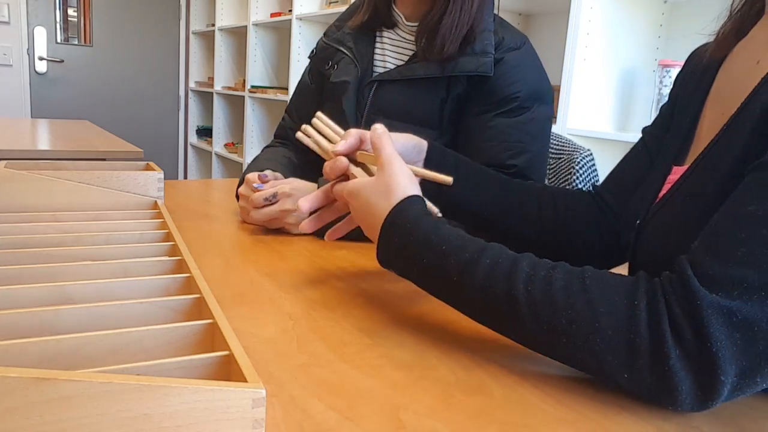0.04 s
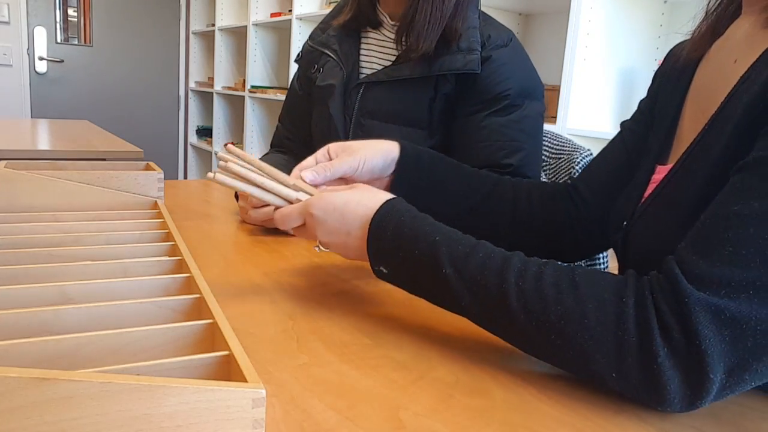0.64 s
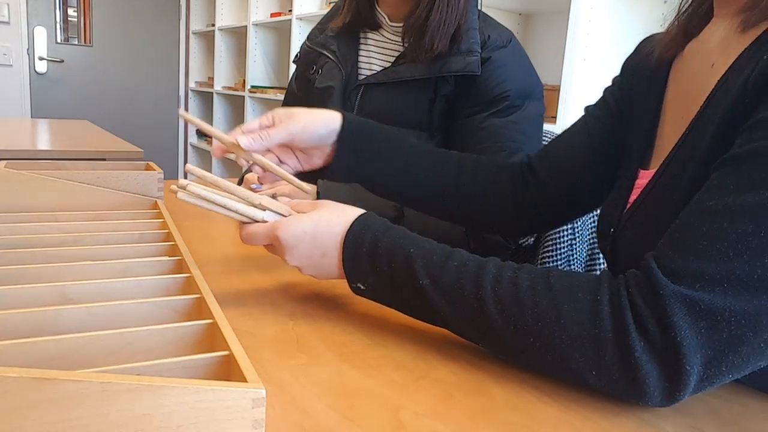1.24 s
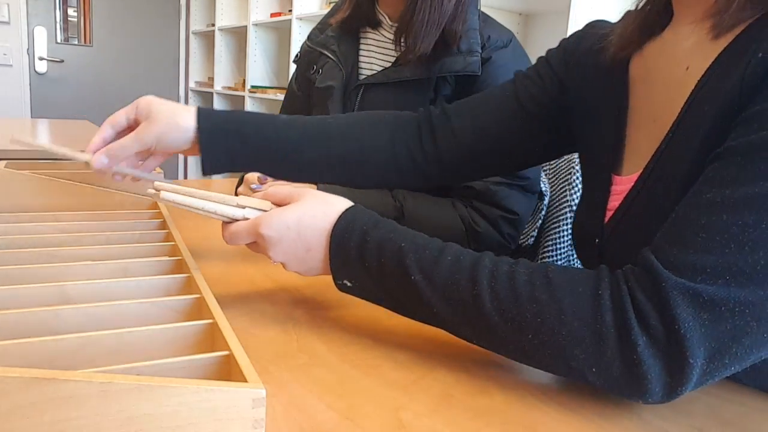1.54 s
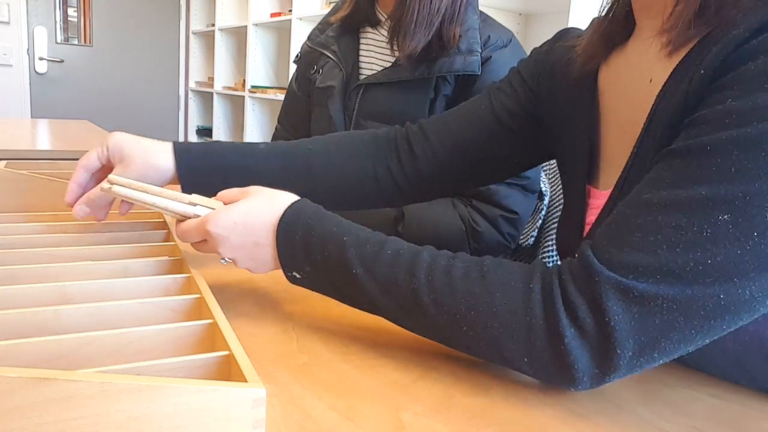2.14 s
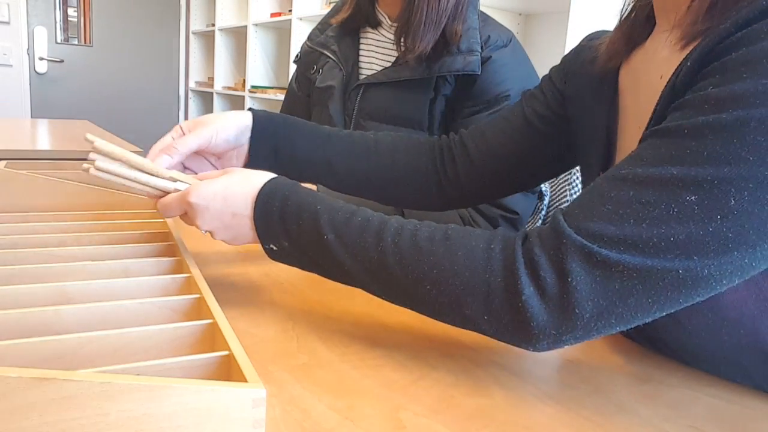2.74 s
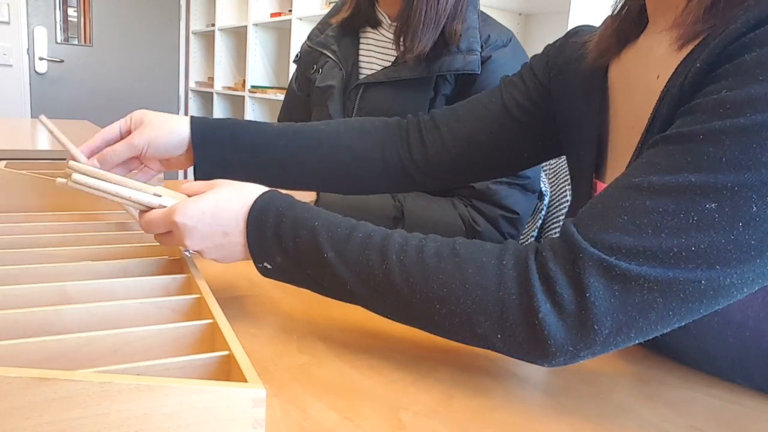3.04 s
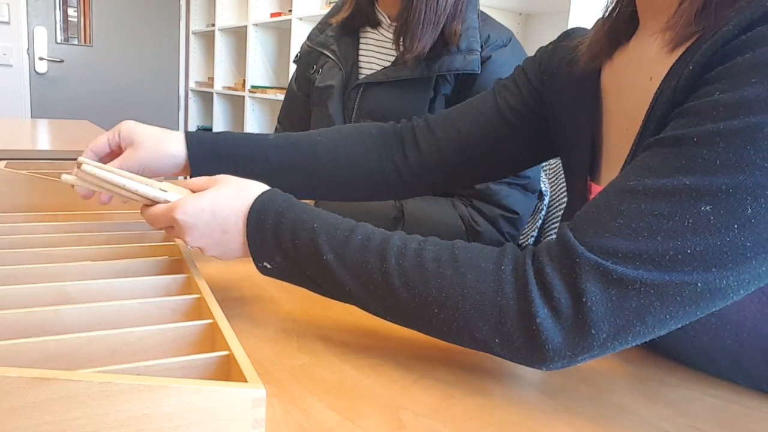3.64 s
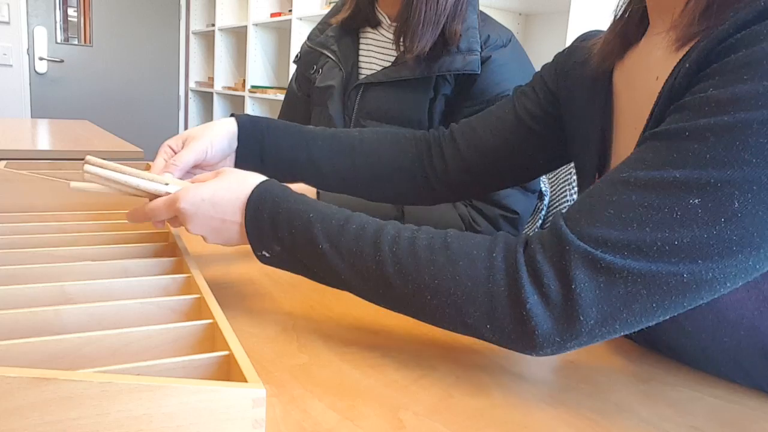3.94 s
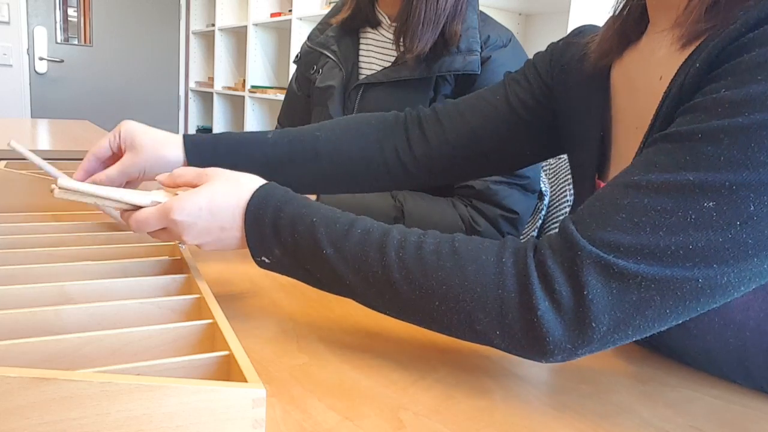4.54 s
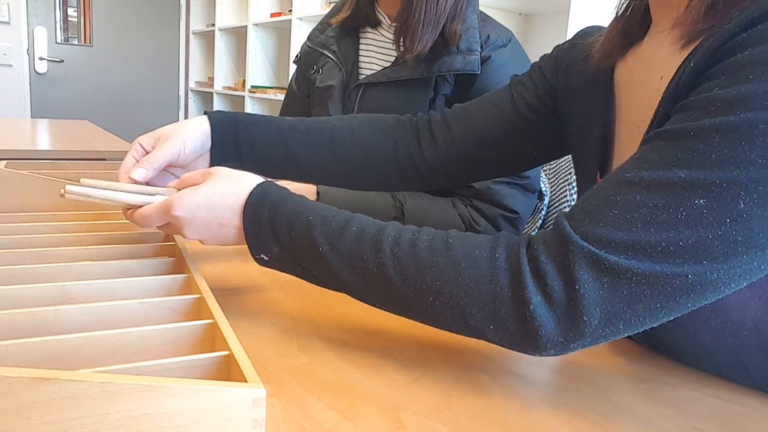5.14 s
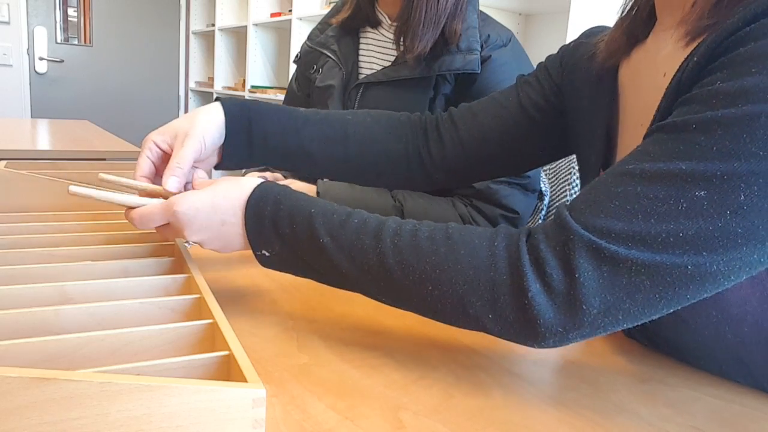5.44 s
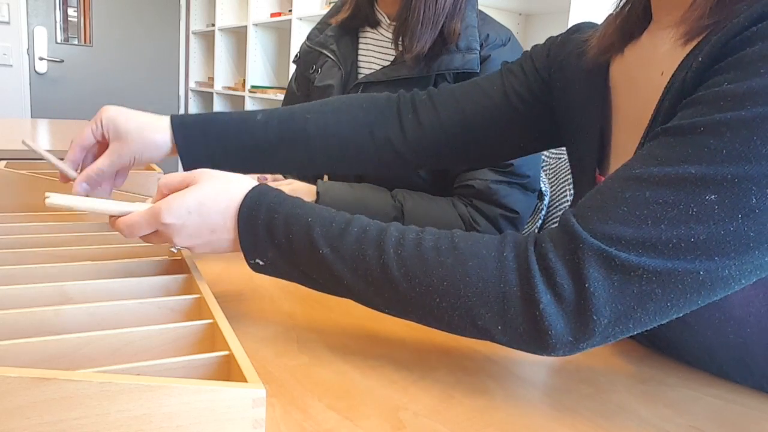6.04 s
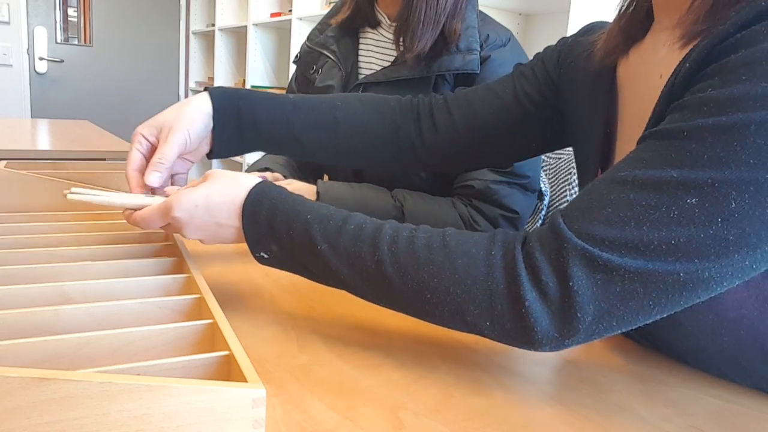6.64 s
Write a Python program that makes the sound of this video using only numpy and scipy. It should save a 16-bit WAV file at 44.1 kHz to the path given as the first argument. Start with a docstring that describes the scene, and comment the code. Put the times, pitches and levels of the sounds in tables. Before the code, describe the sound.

Wooden spindles drop one by one into a wooden box, knocking, clacking and rattling to rest over a low room hum.

```python
"""Wooden spindles drop one by one into a compartment of a wooden box, on a table close to the microphone.
Each knocks on the thin boards, clacks against the spindles already there, bounces and rocks to rest.
Between drops the bundle in the hand ticks and rubs as the next one is drawn.
The room is fairly live, with a low hum behind everything."""
import sys
import numpy as np
from scipy import signal
from scipy.fft import rfft, irfft
from scipy.io import wavfile

SR = 44100
rng = np.random.default_rng(int(sys.argv[2]) if len(sys.argv) > 2 else 0)


def bounce(signal):
    """Save signal as a 16-bit WAV file at the path given by the first command-line argument."""
    frames = np.transpose(np.atleast_2d(signal))
    limited = np.clip(frames, -1, 1)
    pcm = np.round(limited * 32767).astype(np.int16)
    wavfile.write(sys.argv[1], SR, pcm)


N = 299880
HIT_SIZE = 8192
AGE = np.arange(HIT_SIZE) / SR   # seconds since a contact

# spectrum of a push on the boards: f/Hz, level/dB
KNOCK_SPECTRUM = [(60, -29.5), (140, -9), (400, -4), (700, -12), (950, -2), (1400, 1), (2000, -3),
                  (2900, -1), (3800, -11.5), (6000, -22), (8500, -25), (12000, -41), (16000, -44.5)]
# spectrum of wood rubbing on wood: f/Hz, level/dB
RUB_SPECTRUM = [(600, -36.5), (1300, -13), (1900, 1.5), (2700, -7), (3900, -2.5), (5300, -12.5), (8200, -4),
                (9800, -14.5), (11200, -14), (12300, -22.5), (16000, -26.5)]
# a dropped spindle rolling among the others: t/s, length/s, level/dB
ROLL_SPELLS = [(2.178, .14, -37.5), (3.551, 0.094, -36), (3.677, .09, -46.5), (4.676, 0.078, -56.5),
               (4.799, 0.36, -37), (6.141, .03, -38.5), (6.208, .045, -34), (6.321, 0.172, -32.5),
               (6.558, 0.046, -37), (6.714, 0.046, -42.5)]
ROLL_SAG_DB_PER_S = 25
# diffuse sound at the microphone: f/Hz, left-right correlation
COHERENCE = [(30, 0), (70, 1), (150, 0.92), (330, 1), (700, 0.079), (1400, 0.13), (16000, 0)]


def box_knocks(ring_db=-2, spindle_t60=.14, ring_tilt=.4):
    """A knock pushes the boards and rings both box and spindle; soft touches ring duller."""
    # hard landings on the boards: t/s, level/dB, brightness/(dB/octave)
    landings = [ (1.781, -33.5, 2.5), (2.083, -19, 8), (2.089, -12, 1.5), (2.106, -24, 12.5),
                (2.166, -9.5, -2.5), (2.259, -25, 0.5), (2.308, -25.5, 11), (3.261, -44, -5.5),
                (3.389, -39.5, -4), (3.533, -17, -1), (3.54, -12.5, 7.5), (3.579, -16.5, 7.5),
                (3.618, -13, -6), (3.675, -11, 2.5), (3.705, -24, 0), (4.671, -27.5, -2.5),
                (4.795, -20, -2), (4.803, -15, 1), (4.822, -12.5, -6), (4.84, -15, 9), (4.907, -17, -3),
                (5.005, -14, 5.5), (5.076, -16.5, 0.5), (6.308, -10.5, 2.5), (6.324, -17.5, -6),
                (6.329, -13, 4.5), (6.404, -16, -0.5), (6.464, -17, 1.5), (6.549, -12, 3),
                (6.555, -14.5, 7.5)]
    # box resonances: f/Hz, level/dB, t60/s
    box_modes = [(140, -18, 0.1), (239, -17, 0.15), (330, -13.5, 0.14), (406, -21.5, 0.16),
                 (535, -9.5, 0.032), (659, -14.5, 0.09), (870, -7, 0.078), (966, -6, 0.052),
                 (1010, -2.5, 0.061), (1358.5, -0.5, 0.049), (1496, -4, 0.044), (1660, -6.5, 0.024),
                 (1854, -8, 0.031), (2060, -8, 0.12), (2434, -6, 0.059), (2685, -8, 0.11), (2970, -13, .04)]
    # the mode a spindle keeps through its bounces: from t/s, f/Hz, level/dB relative to the push
    spindle_notes = [(0, 6480, -22), (2.24, 6850, -18.5), (3.2, 6470, -24), (4.81, 7380, -11),
                     (5.0, 7470, -29.5), (6.1, 3710, -11.5)]
    out = np.zeros((2, N))
    for s, level_db, brightness in landings + bounces():
        _, hz, spindle_db = [note for note in spindle_notes if note[0] <= s][-1]
        push = near_echoes(pulse(KNOCK_SPECTRUM, brightness), echo_db=-2, span_s=.003)
        tilt = ring_tilt * brightness
        modes = [(f, db + hardness_db(f, tilt), t60) for f, db, t60 in box_modes]
        body = from_db(ring_db) * ringing(modes, detune=.016, left_lag_s=.00022)
        spindle = ringing([(hz, 0, spindle_t60)], spread_db=3, detune=.021)
        add_hit(out, s, level_db, push + body + from_db(spindle_db + hardness_db(hz, tilt)) * spindle)
    return out


def bounces():
    """A spindle bounces or rocks end to end: each touch is weaker, the gaps change by a steady ratio."""
    # t/s, touches, first gap/s, gap ratio, level/dB, loss per touch/dB, brightness/(dB/octave)
    bounce_runs = [ (2.212, 7, .0235, 1.03, -22, 1.2, -6.5), (2.403, 6, .0345, 1.1, -40.5, 0.74, -17.5),
                   (3.752, 4, .012, .95, -23, 2.5, -5.5), (4.884, 5, 0.022, 1.02, -20, 1, 3),
                   (5.041, 4, .0345, 0.94, -21, 3.5, -2.5), (6.147, 6, 0.032, 0.75, -24, 0.9, -5),
                   (6.344, 3, .019, .7, -21.5, 2, -0.5), (6.453, 3, .040, .55, -22, 2, -6.5),
                   (6.591, 4, .022, .78, -21.5, 2, -9.5), (6.701, 4, 0.014, 1.04, -25.5, 0.5, -7)]
    knocks = []
    for s, touches, gap_s, ratio, level_db, loss_db, brightness in bounce_runs:
        for k in range(touches):
            knocks.append((s, level_db - k * loss_db, brightness))
            s += gap_s * ratio ** k
    return knocks


def board_tocks():
    """A square blow makes one board sing; a spindle held on the rim gives a lower, hollow tock."""
    # square blows on a thin board: t/s, level/dB, f/Hz
    blows = [(3.541, -10, 1061), (4.828, -9, 1075), (6.404, -10, 1090)]
    # modes of that board: ratio to the strongest, level/dB, t60/s
    board_modes = [(1, -2.5, 0.063), (1.3, -10.5, 0.025), (1.65, -12.5, 0.04), (2.22, -19.5, .03),
                   (2.85, -10.5, .03)]
    # a held spindle set against the rim: t/s, level/dB
    rim_taps = [(1.751, -19.5), (1.865, -41), (3.259, -42), (3.387, -40.5), (4.745, -41.5)]
    # modes of the rim under the spindle: f/Hz, level/dB, t60/s
    rim_modes = [(407, -10.5, 0.075), (466, -6, 0.045), (685, -4, 0.022), (843, -3.5, 0.018),
                 (990, 2, 0.021), (1710, -7.5, 0.019), (2130, -4.5, .035), (2550, -7, .018),
                 (2850, -8.5, 0.02)]
    out = np.zeros((2, N))
    for s, level_db, hz in blows:
        ring = ringing(board_modes, hz, spread_db=6, detune=.002, sway=.47, left_lag_s=.000081)
        add_hit(out, s, level_db, ring)
    for s, level_db in rim_taps:
        add_hit(out, s, level_db, ringing(rim_modes, detune=.0016, sway=.56, left_lag_s=.00033))
    return out


def spindle_clacks(crack_tilt=.6):
    """Hard wood on hard wood in the box: a sharp crack, then the bending modes of a loose spindle."""
    # spindles striking each other: t/s, level/dB, main mode f/Hz, brightness/(dB/octave)
    strikes = [ (2.084, -20.5, 6500, -2), (2.091, -10, 6450, 17), (2.095, -16.5, 6560, 15),
               (2.187, -26.5, 6470, -10), (2.244, -27.5, 6840, 0), (2.31, -30.5, 6790, -3),
               (3.543, -19.5, 7180, 1), (3.55, -18, 7820, -2), (3.604, -24.5, 6630, -10),
               (3.636, -24.5, 7580, -9), (3.642, -25.5, 6470, -8), (3.708, -32, 7250, -10.5),
               (4.823, -17.5, 7390, -3), (4.839, -21.5, 7280, -6), (4.878, -27, 7430, -6),
               (4.933, -21.5, 7090, -1.5), (5.005, -20.5, 8060, -15), (5.144, -45.5, 7600, -5),
               (5.252, -32, 6900, -1), (6.23, -28, 7000, -22), (6.31, -21, 7160, -20),
               (6.324, -20.5, 6930, -9), (6.335, -22, 7370, -5), (6.403, -24.5, 6630, -21),
               (6.465, -27, 6870, 9), (6.551, -26, 6800, -17)]
    # spectrum of the crack: f/Hz, level/dB
    crack_spectrum = [(300, -36), (1200, -21), (1900, -8), (2700, -6.5), (4100, -5.5), (5400, -4.5),
                      (6100, -7.5), (7600, -5), (8800, -7), (10000, -12.5), (11200, -11), (12800, -19.5),
                      (16000, -19.5)]
    # bending modes: ratio to the main one, level/dB, t60/s
    bending_modes = [(.33, -13, 0.032), (.54, -11, .05), (1, 4.5, .03), (1.08, -0.5, .015),
                     (1.477, -5, 0.036), (2.06, -19, 0.016)]
    out = np.zeros((2, N))
    for s, level_db, hz, brightness in strikes + jostles():
        contact = pulse(crack_spectrum, crack_tilt * brightness, knee_hz=4487)
        crack = near_echoes(contact, echo_db=2.5, span_s=.0033)
        ring = ringing(bending_modes, hz, brightness, spread_db=.34, detune=.0049)
        add_hit(out, s, level_db, crack + ring)
    return out


def rolling(pushes_per_s=450, smooth_share=.15):
    """The grain of a rolling spindle drums on the boards in many small uneven pushes."""
    pushes = ((rng.random(N) < pushes_per_s / SR) + smooth_share) * diffuse(N)
    motion = movement(ROLL_SPELLS, attack_s=.011, sag_db_per_s=ROLL_SAG_DB_PER_S, release_db_per_s=259)
    return motion * coloured(pushes, KNOCK_SPECTRUM)


def jostles(per_s=40, hz=7180, pitch_spread=.045, spread_db=1, brightness=-10):
    """A rolling spindle clacks lightly on its neighbours at uneven moments, each at its own pitch."""
    clacks = []
    for s, length_s, level_db in ROLL_SPELLS:
        ages = np.arange(0, length_s, 1 / per_s)
        for age, (when, strength, pitch) in zip(ages, rng.uniform(-1, 1, (20, 3))):
            onset_s = s + age + (1 + when) / 2 / per_s
            clack_db = level_db - ROLL_SAG_DB_PER_S * age + spread_db * strength
            clacks.append((onset_s, clack_db, hz * (1 + pitch_spread * pitch), brightness))
    return clacks


def table_thuds(t60=.056):
    """The hand or a landing spindle moves a low, well-damped mode of box and table."""
    # dull thuds: t/s, level/dB, f/Hz
    thuds = [(1.78, -27, 145), (4.826, -27, 138), (6.009, -30.5, 70), (6.313, -29, 132)]
    out = np.zeros((2, N))
    for s, level_db, hz in thuds:
        add_hit(out, s, level_db, ringing([(hz, 0, t60)], spread_db=4, detune=.005))
    return out


def bundle_ticks(ring_db=3.5, crack_tilt=.6):
    """Gripped spindles tick together; the fingers damp their ring."""
    # contacts in the hand: t/s, level/dB, brightness/(dB/octave)
    ticks = [(0.206, -42, 3.5), (.2665, -28, 13.5), (.278, -37, 10), (0.285, -32, 0), (.307, -37, -3),
             (.369, -40.5, 3), (0.628, -52.5, 18), (.799, -54.5, -4), (.863, -44, -6), (.919, -32, 4.5),
             (2.041, -57, -12), (2.643, -52.5, 3.5), (2.824, -56.5, -3.5), (3.259, -54, -5),
             (3.387, -55, -6.5), (3.951, -53, -5.5), (4.105, -60, -1.5), (4.398, -58, -8),
             (5.638, -40.5, -6.5), (5.683, -36, 2), (6.787, -38, -8)]
    # modes of the gripped bundle: f/Hz, level/dB, t60/s
    bundle_modes = [(1718, -15.5, 0.028), (1920, -9, 0.093), (3644, -10.5, 0.08), (4320, -1.5, .028),
                    (6920, -5.5, 0.016), (7500, 0, .022), (8860, -4, 0.0056), (10970, -18, .008)]
    out = np.zeros((2, N))
    for s, level_db, brightness in ticks:
        crack = near_echoes(pulse(RUB_SPECTRUM, crack_tilt * brightness), echo_db=3.5, span_s=.0024)
        ring = ringing(bundle_modes, brightness=brightness, spread_db=1.5, detune=.013)
        add_hit(out, s, level_db, crack + from_db(ring_db) * ring)
    return out


def bundle_rubbing(slips_per_s=700, smooth_share=.36, size_spread_db=4):
    """Sliding spindles catch and slip in many tiny grains of uneven size."""
    # spindles sliding in the hand: t/s, length/s, level/dB
    slides = [(0, 0.12, -62.5), (.21, 0.18, -58), (.365, 0.024, -53.5), (.60, 0.088, -68),
              (.83, 0.099, -62), (1.38, 0.28, -75), (2.65, 0.11, -72.5), (5.44, .15, -71),
              (5.625, .04, -60.5)]
    sizes = from_db(size_spread_db * np.minimum(rng.exponential(1, N), 4))
    slips = (rng.random(N) < slips_per_s / SR) * sizes + smooth_share
    pressure = movement(slides, attack_s=.014, sag_db_per_s=11, release_db_per_s=111)
    return pressure * coloured(slips * rng.standard_normal((2, N)), RUB_SPECTRUM)


def box_radiation(x):
    """The boards send each pitch to the two sides of the microphone with its own strength and phase."""
    # stereo image of the box: f/Hz, left minus right/dB, left phase lead/rad
    image = [(332, 0, 0.29), (604, 0, 1.6), (950, -7.5, -1.2), (1420, 1.5, .4), (2000, 1, -0.83),
             (3800, -2.5, -0.27), (7000, 0.5, 0.32)]
    hz = np.fft.rfftfreq(N, 1 / SR)
    balance_db = at_hz([(f, db) for f, db, _ in image], hz)
    lead = at_hz([(f, rad) for f, _, rad in image], hz)
    sides = np.array([[.5], [-.5]])
    return irfft(rfft(x) * from_db(sides * balance_db) * np.exp(1j * sides * lead), N)


def room(x, tail_db, early_db, early_t60=.12, first_s=.0037):
    """Direct sound, close reflections off table and people, and a tail that dies sooner in the treble."""
    # reverberation time: f/Hz, t60/s
    decay_times = [(120, 0.94), (400, 1), (1000, 0.49), (2500, 0.22), (7000, 0.3), (11000, 0.33),
                   (16000, 0.31)]
    age, hz = np.arange(SR) / SR, np.fft.rfftfreq(SR, 1 / SR)
    centres = np.geomspace(100, 16000, 12)
    noise, tail = rfft(diffuse(SR)), 0
    for centre, share in zip(centres, np.eye(len(centres))):
        band = irfft(noise * np.interp(np.log(hz + 1), np.log(centres), share), SR)
        tail = tail + band * decay(age, at_hz(decay_times, centre))
    early = diffuse(SR) * decay(age, early_t60)
    arrival = np.clip(age / first_s - .5, 0, 1)
    response = from_db(tail_db) * unit(tail * arrival) + from_db(early_db) * unit(early * arrival)
    return x + signal.fftconvolve(x, response, axes=1)[:, :N]


def room_tone(rumble_db=-52, waver_hz=2.1, waver_depth=1.2):
    """A low rumble from all sides with a few wavering hum lines in the centre."""
    # spectrum of the rumble: f/Hz, relative level/dB
    rumble_spectrum = [(15, -35.5), (25, -8.5), (45, -3.5), (137, -6), (166, -14), (200, -3.5), (223, -8.5),
                       (293, -7.5), (405, -12), (659, -30), (818, -24), (1230, -33.5), (2050, -36.5),
                       (5140, -45), (8830, -49.5), (16000, -44)]
    # hum lines: f/Hz, level/dB
    hum_lines = [(100, -59.5), (137, -61.5), (199.5, -61.5)]
    t = np.arange(N) / SR
    out = from_db(rumble_db) * coloured(diffuse(N), rumble_spectrum)
    slow_band = np.exp(-(np.fft.fftfreq(N, 1 / SR) / waver_hz) ** 2)
    for hz, level_db in hum_lines:
        wander = np.fft.ifft(slow_band * np.exp(2j * np.pi * rng.random(N)))
        waver = 1 + waver_depth * wander / np.std(wander)
        out += from_db(level_db) * np.real(waver * np.exp(2j * np.pi * hz * t))
    return out


def pulse(spectrum, brightness, knee_hz=2000):
    """The causal (minimum-phase) pulse of one contact; harder contacts have more treble."""
    hz = np.fft.rfftfreq(HIT_SIZE, 1 / SR)
    level_db = at_hz(spectrum, hz) + hardness_db(hz, brightness, knee_hz)
    cepstrum = irfft(np.log(from_db(level_db)))
    cepstrum[HIT_SIZE // 2:] = 0
    return unit(irfft(np.exp(rfft(2 * cepstrum))))


def hardness_db(hz, brightness, knee_hz=2000):
    """Treble that a hard contact adds, or a soft one takes away."""
    return brightness * np.log2(1 + (hz / knee_hz) ** 2) / 2


def ringing(modes, pitch=1, brightness=0, spread_db=0, detune=0, sway=2, left_lag_s=0):
    """Decaying modes; strengths scatter from blow to blow, and sway scatters the phase on each side."""
    hz, level_db, t60 = np.transpose(modes)
    hz = hz * pitch * (1 + detune * rng.standard_normal(len(hz)))
    gains = from_db(level_db + brightness * np.log2(hz) + spread_db * rng.standard_normal((2, len(hz))))
    phases = sway * rng.uniform(-1, 1, (2, len(hz))) * (1 - at_hz(COHERENCE, hz))
    phases[0] -= 2 * np.pi * hz * left_lag_s
    cycles = hz[:, None] * AGE
    waves = np.sin(2 * np.pi * cycles + phases[:, :, None]) * rng.choice([-1, 1], (len(hz), 1))
    swell = (1 - np.exp(-2 * cycles)) ** 2   # a mode builds up within its first cycles
    return unit(np.sum(gains[:, :, None] * waves * swell * decay(AGE, t60[:, None]), axis=1))


def near_echoes(click, echo_db, span_s, count=6):
    """A pulse reaches the microphone's right side first, then comes again off nearby wood."""
    paths = np.zeros((2, HIT_SIZE))
    paths[0, 7] = paths[1, 0] = 1   # direct path, 7 samples later on the left
    lags_s = .0007 + span_s * rng.random(count) ** 2
    strengths = from_db(echo_db) * rng.choice([-1, 1], count) * np.exp(-lags_s / span_s)
    for side in paths:
        side[(lags_s * SR).astype(int) + rng.integers(-10, 11, count)] += strengths
    return unit(signal.fftconvolve(paths, click[None], axes=1)[:, :HIT_SIZE])


def add_hit(track, s, level_db, hit):
    """Lay a hit into a track; its level is that of its energy packed into 2 ms."""
    start = int(s * SR)
    gain = from_db(level_db) * np.sqrt(.002 * SR)
    track[:, start:start + HIT_SIZE] += gain * unit(hit)[:, :N - start]


def movement(spells, attack_s, sag_db_per_s, release_db_per_s):
    """Gain of a series of movements: each starts quickly, loses strength as it goes on and dies away."""
    t, out = np.arange(N) / SR, np.zeros(N)
    for s, length_s, level_db in spells:
        age = np.maximum(t - s, 0)
        fall_db = sag_db_per_s * age + release_db_per_s * np.maximum(age - length_s, 0)
        out = np.maximum(out, np.minimum(age / attack_s, 1) * from_db(level_db - fall_db))
    return out


def diffuse(size):
    """White stereo noise arriving from all sides: alike in the bass, unrelated in the treble."""
    alike = np.clip(at_hz(COHERENCE, np.fft.rfftfreq(size, 1 / SR)), -.99, .99)
    mid, side = rfft(rng.standard_normal((2, size)))
    return irfft(np.sqrt(1 + alike) * mid + np.sqrt(1 - alike) * side * [[1], [-1]], size)


def coloured(x, spectrum):
    """Give a steady sound a spectrum; rms 1."""
    hz = np.fft.rfftfreq(N, 1 / SR)
    return unit(irfft(rfft(x) * from_db(at_hz(spectrum, hz)), N)) * np.sqrt(N)


def at_hz(points, hz):
    """Read a table along a logarithmic frequency axis."""
    freqs, values = np.transpose(points)
    return np.interp(np.log(np.maximum(hz, 1)), np.log(freqs), values)


def decay(age, t60):
    """Gain that falls 60 dB in t60 seconds."""
    return from_db(-60 * age / t60)


def from_db(db):
    """Decibels to gain."""
    return 10 ** (np.asarray(db) / 20)


def unit(x):
    """Scale to a mean energy of one per channel."""
    return x / np.sqrt(np.mean(np.sum(x ** 2, axis=-1)) + 1e-20)


def scene(tock_right_db=3.5, clack_right_db=.06):
    """The box close up, the room behind it; the ringing boards face the microphone and carry less room."""
    left_right = np.array([[-1], [1]])
    knocks = room(box_radiation(box_knocks() + rolling()), tail_db=-8.5, early_db=-9.5)
    tocks = room(board_tocks(), tail_db=-11.5, early_db=-17)
    tocks *= from_db(tock_right_db * left_right)
    clacks = room(spindle_clacks() + bundle_ticks(), tail_db=-7, early_db=-4.5)
    clacks *= from_db(clack_right_db * left_right)
    return knocks + tocks + clacks + table_thuds() + bundle_rubbing() + room_tone()


def record(dry, ceiling=.63, cutoff_hz=16000):
    """The tallest peaks are rounded and the top of the treble is cut."""
    low_pass = signal.ellip(10, .2, 80, cutoff_hz, fs=SR, output="sos")
    return signal.sosfilt(low_pass, ceiling * np.tanh(dry / ceiling))


dry = scene()
out = record(dry)
bounce(out)
```